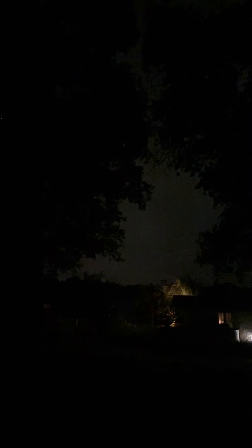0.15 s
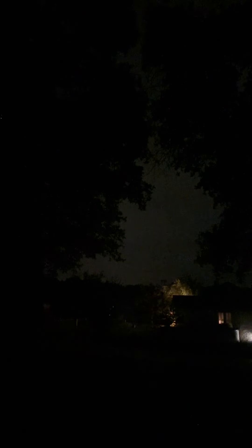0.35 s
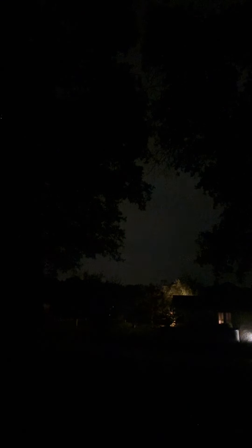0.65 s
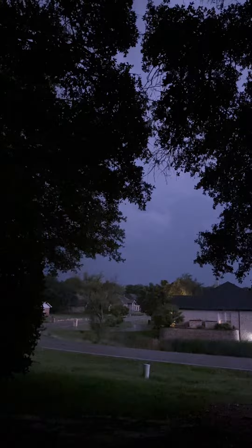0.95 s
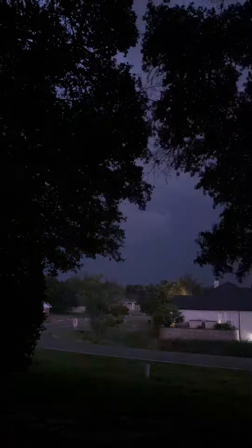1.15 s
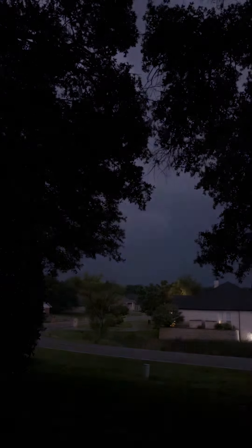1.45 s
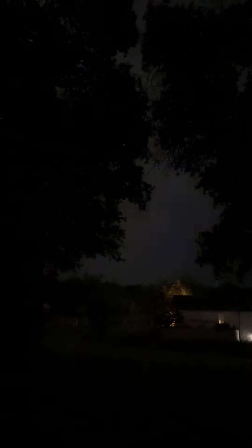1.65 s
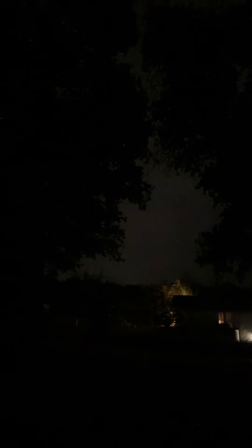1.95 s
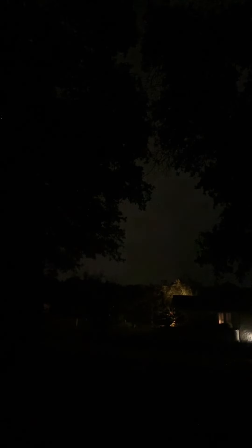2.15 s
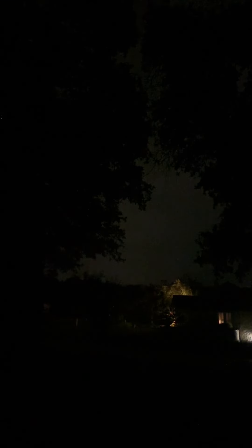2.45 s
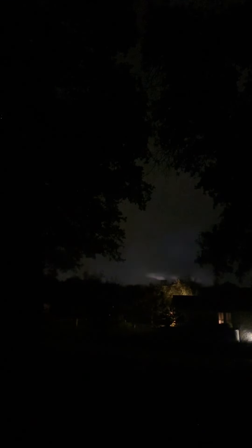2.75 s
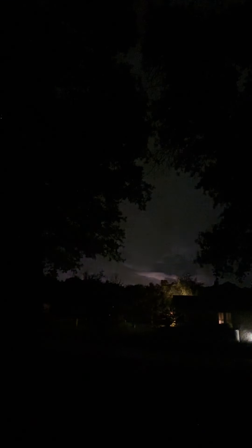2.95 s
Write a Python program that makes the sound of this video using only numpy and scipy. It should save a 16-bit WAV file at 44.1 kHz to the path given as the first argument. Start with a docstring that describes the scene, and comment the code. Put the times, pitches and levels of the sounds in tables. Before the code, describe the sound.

Rain falling steadily outdoors at night, sharp near drops ticking over faint, wavering far thunder

```python
"""Steady night rain on trees and a lawn, heard from under shelter: flickering noise with small ringing ticks.
A few drops smack down close by, each a click with a short ring and a spray.
Two dull knocks sound from something hollow, made of a burst of noise and dying tones.
A low hum wavers in the rumble of a far storm, which is deep noise that swells and sinks.
The bass is alike on both sides; the rain is wide, and the near drops reach the right late and upside down."""
import sys
import numpy as np
from scipy import signal
from scipy.fft import rfft, irfft
from scipy.io import wavfile
from scipy.ndimage import uniform_filter1d

SR = 44100
rng = np.random.default_rng(int(sys.argv[2]) if len(sys.argv) > 2 else 0)


def transcribe(signal):
    """Save signal, clipped to [-1, 1], as a 16-bit WAV file at the path in sys.argv[1]."""
    frames = np.atleast_2d(signal).T
    limited = np.clip(frames, -1, 1)
    pcm = np.round(limited * 32767).astype(np.int16)
    wavfile.write(sys.argv[1], SR, pcm)


N = 136710
T = np.arange(N) / SR  # time of each sample, s
HZ = np.arange(N // 2 + 1) * SR / N  # frequency of each spectrum step

# tone colour of the rain, shared by hiss and ticks: f/Hz, level per Hz/dB
RAIN_COLOUR = [(30, -31), (110, -3), (400, -3), (500, 1), (800, 3), (1300, 0), (1900, 0), (2500, -0.5),
               (3800, 1.5), (4700, 0), (5300, 3), (6500, .5), (8500, 0), (11000, -3.5), (13000, -3.5),
               (16000, -5)]


def from_db(db):
    """Turn decibels into a gain."""
    return 10 ** (np.asarray(db) / 20)


def rms_one(x):
    """Scale a sound to an rms (average strength) of 1."""
    return x / np.sqrt(np.mean(x ** 2) + 1e-20)


def over_time(points):
    """Read a table along time, with straight lines between its points."""
    return np.interp(T, *np.transpose(points))


def over_hz(points):
    """Read a table along log frequency, as the ear spaces pitches."""
    hz, value = np.transpose(points)
    return np.interp(np.log(HZ + 1), np.log(hz), value)


def colour(x, spectrum):
    """Weight each frequency of a sound by a table, then set its rms to 1."""
    return rms_one(irfft(rfft(x) * from_db(over_hz(spectrum)), N))


def drift(rate_hz):
    """Slow random wandering of rms 1: noise that fades out above the given rate."""
    slow = rfft(rng.standard_normal(N)) / (1 + (HZ / rate_hz) ** 2) ** 2
    return rms_one(irfft(slow, N))


def high_pass(x, hz):
    """Weaken what lies below a frequency."""
    sos = signal.butter(2, min(hz, SR / 3), "high", fs=SR, output="sos")
    return signal.sosfilt(sos, x)


def click(s):
    """A one-sample impulse of height 1 at a given time."""
    return (np.arange(N) == int(s * SR)) + 1e-18  # the tiny floor avoids slow near-zero arithmetic


def ring(x, hz, t60):
    """A resonance: a unit click sets off a sine of height 1 that falls 60 dB in t60 seconds."""
    decay = from_db(-60 / (t60 * SR))
    turn = 2 * np.pi * hz / SR  # radians per sample
    return signal.lfilter([0, np.sin(turn)], [1, -2 * decay * np.cos(turn), decay * decay], x)


def scatter(x, t60):
    """Smear a sound into a dying noise tail of about the same energy, different on each side."""
    t = T[:SR // 2]
    tail = rng.standard_normal((2, len(t))) * np.exp(-np.log(1000) * t / t60)
    tail = tail / np.sqrt(np.sum(tail[0] ** 2))
    return signal.fftconvolve(x[None], tail, axes=1)[:, :N]


def right_turn():
    """Turn the phase of the right channel by a table along frequency, which widens the sound."""
    # stereo phase of rain and noise: f/Hz, how far the right channel is turned back/rad
    turn_back = [(0, 0), (700, -1), (1400, -1.16), (2000, 1.06), (2700, 2.5), (3600, 2), (5050, 1.06),
                 (5700, 3), (6150, 3.5), (7700, 7), (8750, 5), (10200, 9.5), (11500, 9.5), (12700, 13.5),
                 (14200, 13.5), (15500, 14)]
    return np.exp(-1j * np.interp(HZ, *np.transpose(turn_back)))


def pair(two):
    """Mix two unrelated sounds into stereo: the shared part sets how wide or narrow each frequency sounds."""
    # stereo width of the noise: f/Hz, likeness of left and right/0 wide to 1 narrow
    likeness = [(200, 0.48), (500, 0.44), (1100, 0.41), (1800, 0.87), (2500, 0.54), (3200, 0.39),
                (4000, 0.13), (4900, 0.96), (5800, 1), (7000, 0.45), (8200, 1), (9500, 0.45), (10400, 1),
                (11400, 1), (12100, 0.34), (13000, 0.83), (14000, .98), (14800, 0.97), (15600, 1)]
    # balance of the two channels: f/Hz, left minus right gain/dB
    balance = [(300, 6), (450, 3.5), (600, 5.5), (900, 2.5), (1400, 2), (2000, 0), (4000, -0.5), (5200, 0),
               (6500, -0.5)]
    a, b = rfft(two)
    alike = np.clip(over_hz(likeness), 0, .995)
    mid = np.sqrt(1 + alike) * a
    side = np.sqrt(1 - alike) * b
    tilt = from_db(over_hz(balance) / 2)
    left = (mid + side) * tilt
    right = (mid - side) / tilt * right_turn()
    return irfft(np.array([left, right]), N)


def wash(count=24):
    """Countless far drops merge into a hiss of noise; each frequency band flickers by itself."""
    level_db, flicker_db, flicker_hz = -44.5, 1.82, 29
    white = rfft(rng.standard_normal((2, N)))
    band = np.searchsorted(np.geomspace(400, 15000, count - 1), HZ)  # band number of each frequency
    bands = 0
    for k in range(count):
        flicker = from_db(flicker_db * drift(flicker_hz))
        bands = bands + irfft(white * (band == k), N) * flicker
    return from_db(level_db) * colour(pair(bands), RAIN_COLOUR)


def patter(count=20):
    """Nearer drops of uneven size tick on leaves, each ringing a few cycles at one of several pitches."""
    level_db, spread_db = -53, 2.5
    drops_per_s, cycles = 2200, 8  # drops in both signals together; cycles to fall 60 dB
    size_db = spread_db * np.minimum(rng.exponential(1, (2, N)), 4.5)
    sizes = from_db(size_db) * rng.choice([-1, 1], (2, N))
    hits = sizes * (rng.random((2, N)) < drops_per_s / 2 / SR)
    dealt = rng.integers(0, count, N)  # which pitch a drop gets
    ticks = 0
    for k, hz in enumerate(np.geomspace(900, 14000, count)):
        ticks = ticks + hz * ring(hits * (dealt == k) + 1e-18, hz, cycles / hz)
    return from_db(level_db) * colour(pair(ticks), RAIN_COLOUR)


def rain():
    """Hiss and ticks swell and sink together a little, at random."""
    swell_db, swell_hz = 0.36, 9.4
    return (wash() + patter()) * from_db(swell_db * drift(swell_hz))


def drops():
    """Each near drop is a sharp smack that jolts the surface it hits, a ring of a few cycles and a fine spray."""
    # near drops, ring and smack before filtering: t/s, ring level/dB, ring f/Hz, ring time to fall 60 dB/s,
    # strength of the hit relative to the ring/dB, spray relative to the drop before the common spray level/dB
    near_drops = [(0.1835, -27, 5630, 0.0025, -14, -6), (0.336, -37, 7000, 0.00067, 5, 6),
                  (0.446, -17.5, 4750, 0.0041, -14, -7), (.4581, -26, 5000, .002, -9, -10),
                  (0.543, -23.5, 7000, 0.0008, -1.5, -4), (0.615, -34, 5200, .001, 7, -6),
                  (1.0854, -16, 5340, 0.0025, 11.3, -9.5), (1.0966, -31, 8500, 0.00092, -3, -4),
                  (1.2385, -35, 8000, 0.0017, -3, 3), (1.5476, -22, 7000, 0.0016, -4, -4),
                  (1.8539, -21, 5500, 0.002, 2.5, -3), (1.8673, -29, 8500, 0.00091, -1, -1),
                  (2.2872, -25, 7200, 0.0014, -18, -4), (2.4505, -23, 6700, 0.0011, -16, 1),
                  (2.46, -26, 6100, 0.0028, -14, 2), (2.469, -31, 4170, 0.0008, -10, 13),
                  (2.7002, -29, 6560, .0012, -22, -10), (2.885, -21.5, 4500, 0.0034, -14, -6),
                  (3.034, -30, 7800, .001, -4, -10)]
    # ringing of the surface: f/Hz, level relative to the hit/dB, time to fall 60 dB/s
    surface_modes = [(1090, -19, 0.0011), (10400, -21, 0.0016)]
    smack_cut_hz, drop_cut_hz = 7000, 5450  # high-pass of the smack, then of smack and ring together
    spray_level_db, spray_t60_s, right_lag_s = -2, 0.13, .000172
    direct, spray = 0, 0
    for s, db, hz, t60, smack_db, spray_db in near_drops:
        hit = from_db(db + smack_db) * click(s)
        smack = high_pass(2 * hit, smack_cut_hz)
        drop = high_pass(smack - from_db(db) * ring(click(s), hz, t60), drop_cut_hz)
        surface = 0
        for mode_hz, mode_db, mode_t60 in surface_modes:
            surface = surface + from_db(mode_db) * ring(hit, mode_hz, mode_t60)
        direct = direct + drop - surface
        spray = spray + from_db(spray_db) * drop
    # the right channel gets the drops late and upside down
    right = -irfft(rfft(direct) * np.exp(-2j * np.pi * HZ * right_lag_s), N)
    return np.array([direct, right]) + from_db(spray_level_db) * pair(scatter(spray, spray_t60_s))


def knocks():
    """Each blow is a brief clack of contact and a thud of the hollow body, with a short echo of the shelter."""
    # knocks and their rebounds: t/s, thud level/dB, pitch relative to the body/ratio, clack level at its start/dB
    blows = [(1.9056, -38.5, 1.01, -40.5), (1.9156, -42, 1, -62), (1.922, -58, 1, -44),
             (1.961, -44.5, 1.04, -58), (2.4707, -50.5, 0.93, -41), (2.474, -45, .94, -54),
             (2.4812, -45.5, .92, -53), (2.526, -53, 0.88, -65)]
    # tones of the hollow body: f/Hz, level relative to the thud/dB, time to fall 60 dB/s
    body = [(250, -5, .1), (292, -0.5, 0.065), (340, -2, .04), (388, 2.5, 0.058), (490, -13, 0.025),
            (780, -1, 0.018)]
    # tone colour of the clack: f/Hz, gain/dB
    clack_colour = [(300, -16), (800, 1), (1300, -3), (1800, 0), (2600, -4), (6000, -29)]
    clack_t60_s, echo_db, echo_t60_s = .025, -4, 0.41
    thud, contact = 0, 0
    for s, db, pitch, clack_db in blows:
        for hz, mode_db, t60 in body:
            thud = thud + from_db(db + mode_db) * ring(click(s), pitch * hz, t60)
        contact = contact + (T >= s) * from_db(clack_db - 60 * np.abs(T - s) / clack_t60_s)
    clack = contact * colour(pair(rng.standard_normal((2, N))), clack_colour)
    return thud + clack + from_db(echo_db) * scatter(thud, echo_t60_s)


def hum():
    """A low sine wavers in level and, through small random shifts of its phase, in pitch."""
    # level of the hum before the overall level is set: t/s, level/dB
    hum_swell = [(0, -5), (.12, 1), (.22, -7.5), (.33, 0.5), (.65, 3), (.76, -27), (.95, 2.5), (1.06, -2.5),
                 (1.15, 1), (1.28, -3), (1.4, 3), (1.58, -7), (1.73, -4.5), (1.87, -4), (2, 4), (2.15, 1.5),
                 (2.3, -1.5), (3.1, -3)]
    hum_hz, level_db, waver_db, waver_rad = 105.8, -45, 1.34, 0.55
    tone = np.sin(2 * np.pi * hum_hz * T + waver_rad * drift(20))
    swell = from_db(over_time(hum_swell) + waver_db * drift(3.2))
    return from_db(level_db) * rms_one(tone * swell)


def thunder():
    """A deep roll of noise, alike on both sides, swells and sinks over a steady rumble."""
    # tone colour of the far thunder: f/Hz, level per Hz/dB
    thunder_colour = [(15, -29), (28, -18), (38, -6), (50, -1), (70, 5), (90, -1), (120, -5.5),
                      (170, -22.5), (400, -57)]
    # swell of the thunder, added to its overall level: t/s, level/dB
    roll_swell = [(0, -3.5), (.2, -2.5), (.38, 2), (.5, 1), (.72, -3), (.84, 8), (.97, -0.5), (1.13, 2),
                  (1.23, -3.5), (1.42, 3.5), (1.52, -3.5), (1.62, 6), (1.75, -2.5), (1.95, -4),
                  (2.07, -1.5), (2.39, 1.5), (2.55, -3.5), (2.85, 2.5), (3.1, -7)]
    # tone colour of the steady far rumble: f/Hz, level per Hz/dB
    rumble_colour = [(40, -18), (80, -4), (115, 1), (145, 1), (180, -5.5), (215, -7.5), (255, -5.5),
                     (320, -15.5), (395, -14.5), (460, -24), (900, -73)]
    thunder_db, rumble_db, even_s = -43.5, -47.5, 0.16
    roll = colour(rng.standard_normal(N), thunder_colour)
    # even out the chance swells of the noise, so that the table sets the level
    roll = roll / np.sqrt(uniform_filter1d(roll ** 2, int(even_s * SR)))
    roll = roll * from_db(thunder_db + over_time(roll_swell))
    rumble = from_db(rumble_db) * colour(rng.standard_normal(N), rumble_colour)
    return roll + rumble


def scene():
    """Add up rain and near sounds over the low storm."""
    return rain() + drops() + knocks() + hum() + thunder()


def record(dry):
    """Cut the top steeply."""
    cutoff_hz = 16000
    return irfft(rfft(dry) / np.sqrt(1 + (HZ / cutoff_hz) ** 200), N)


dry = scene()
out = record(dry)
transcribe(out)
```